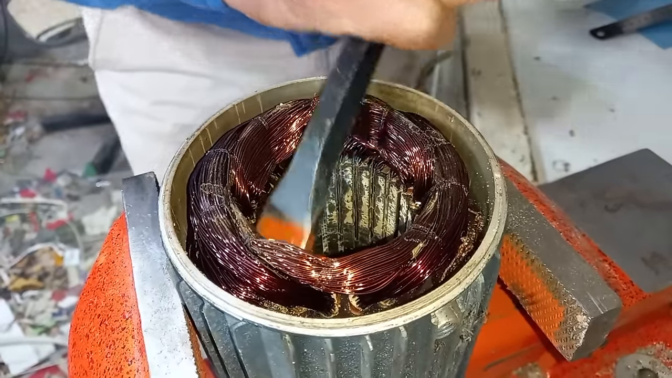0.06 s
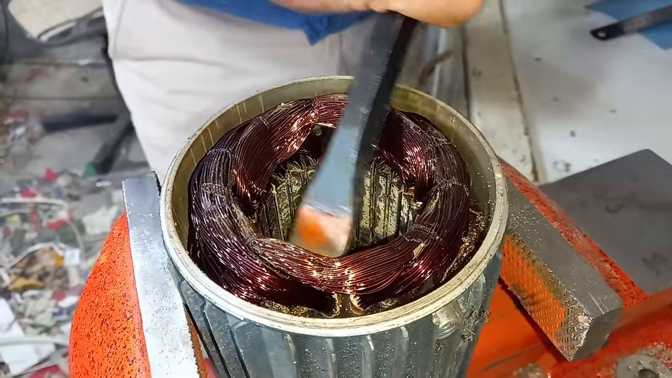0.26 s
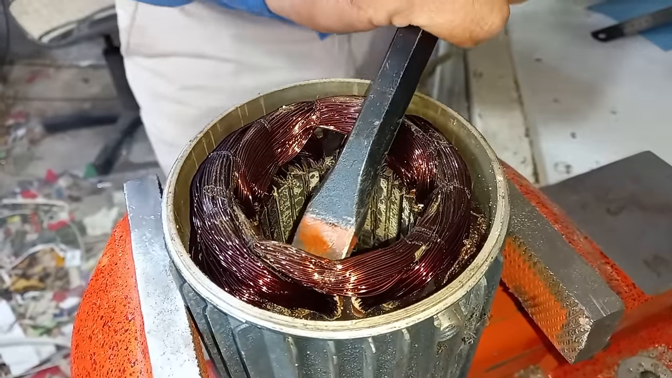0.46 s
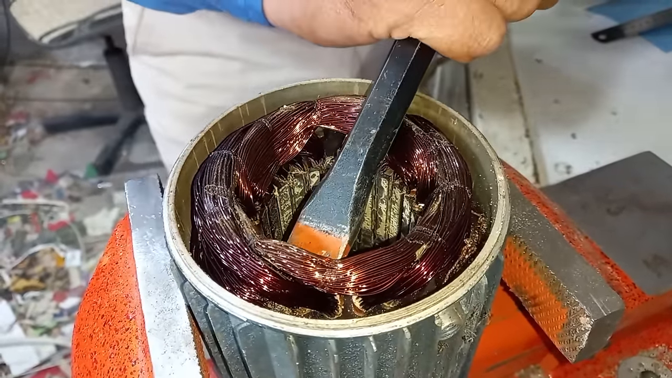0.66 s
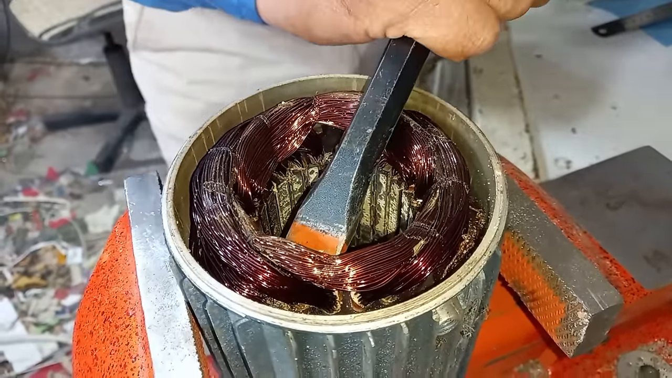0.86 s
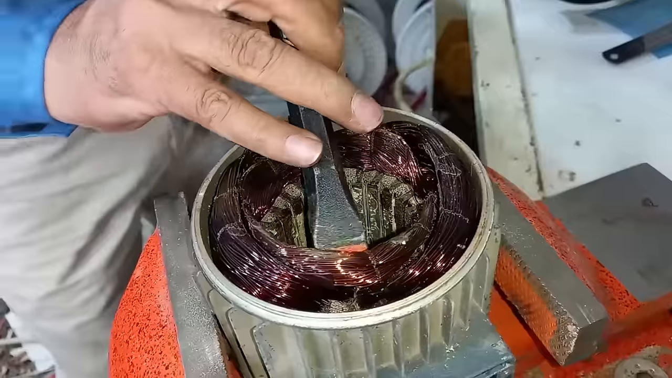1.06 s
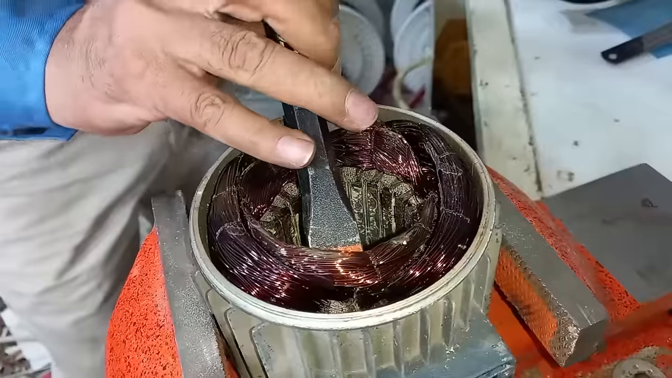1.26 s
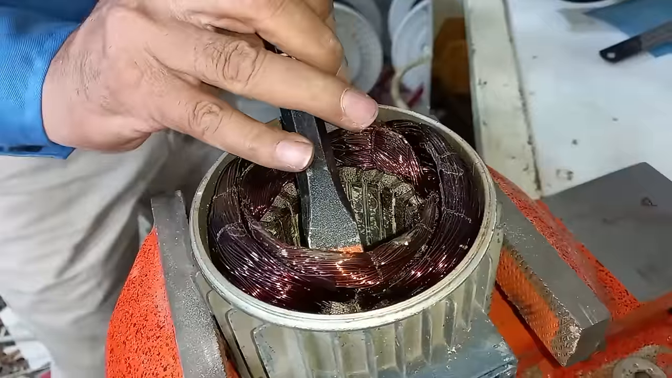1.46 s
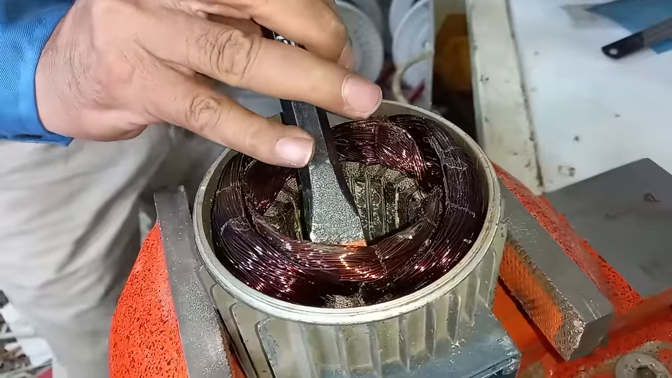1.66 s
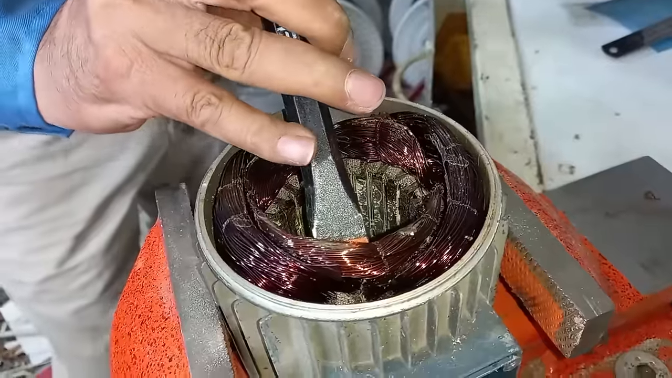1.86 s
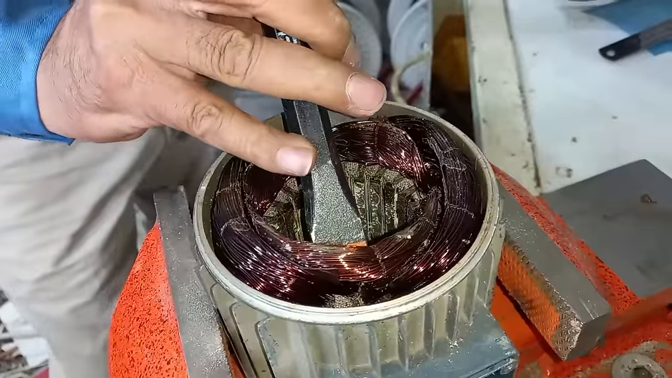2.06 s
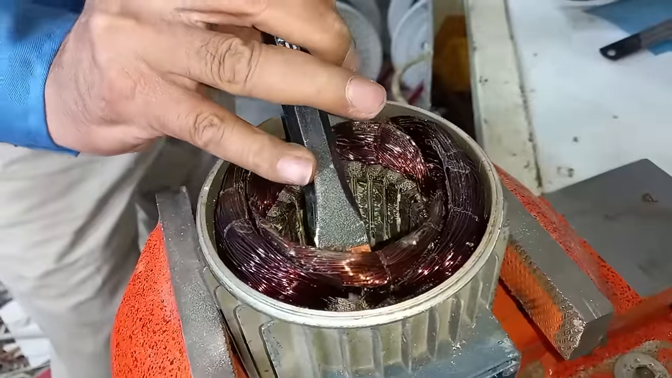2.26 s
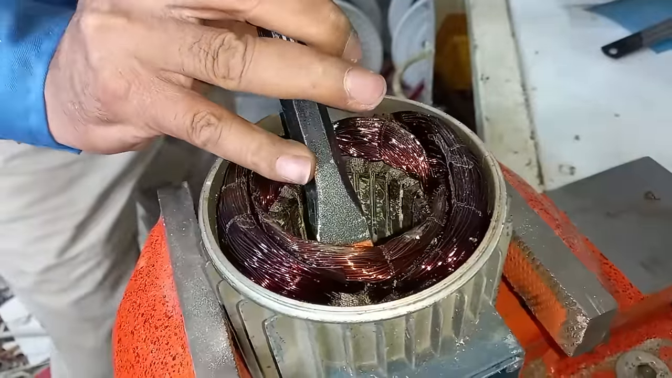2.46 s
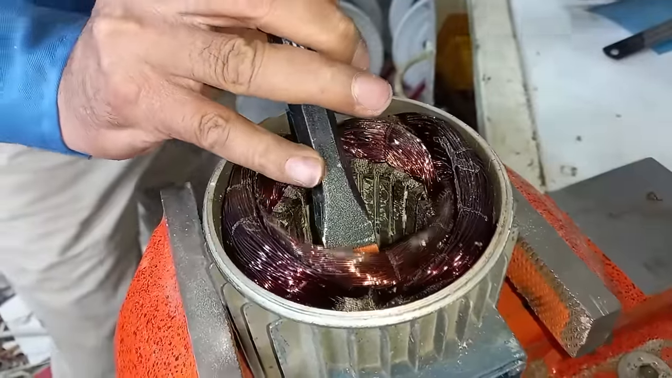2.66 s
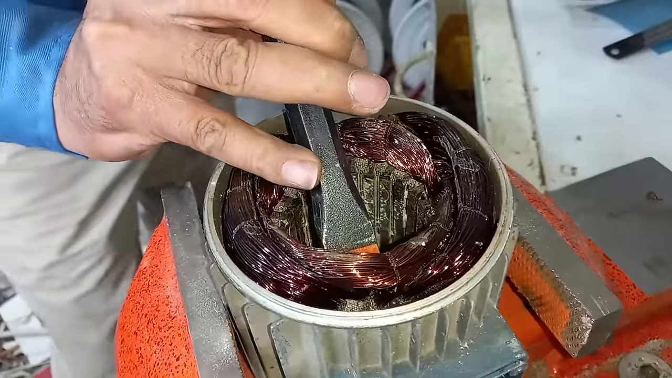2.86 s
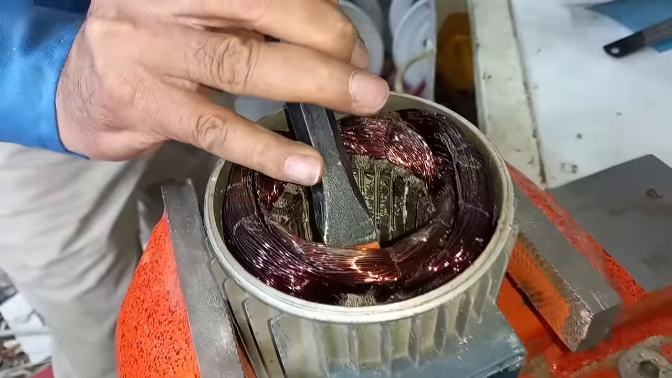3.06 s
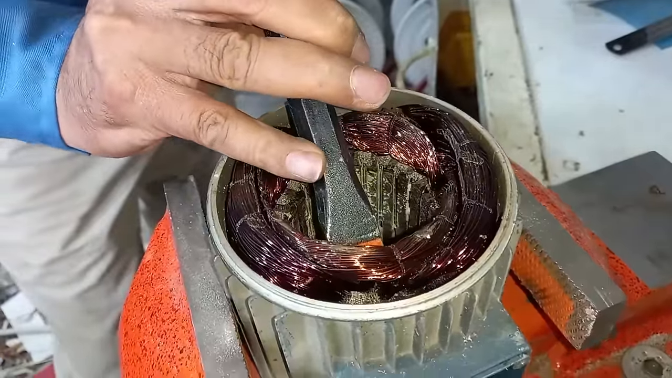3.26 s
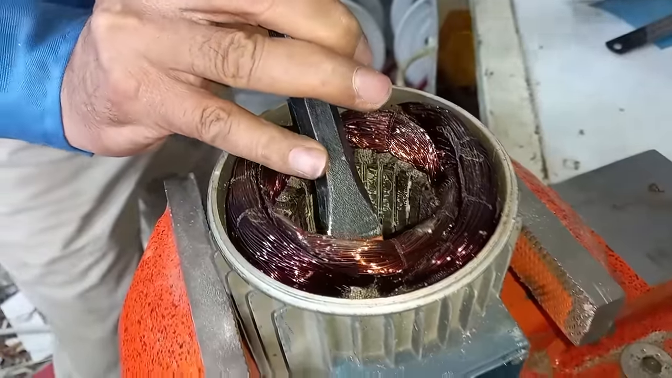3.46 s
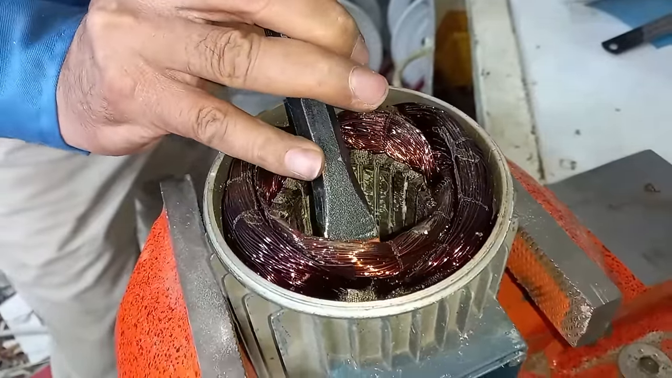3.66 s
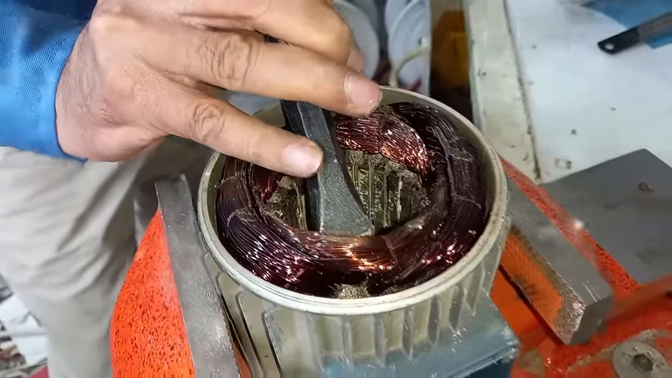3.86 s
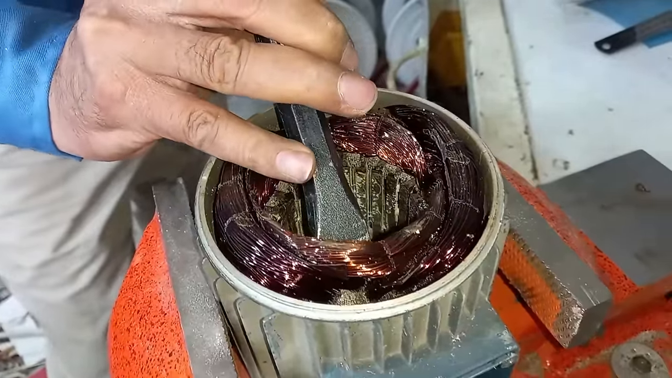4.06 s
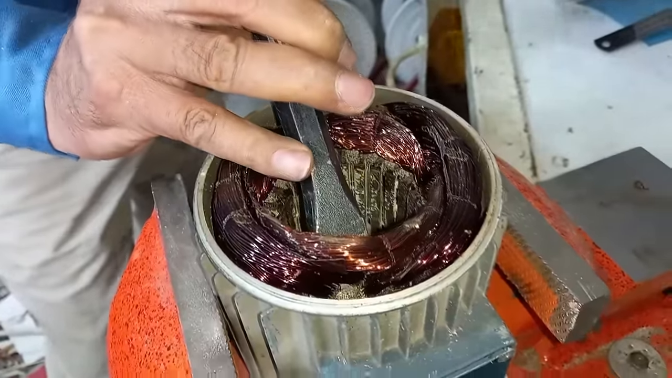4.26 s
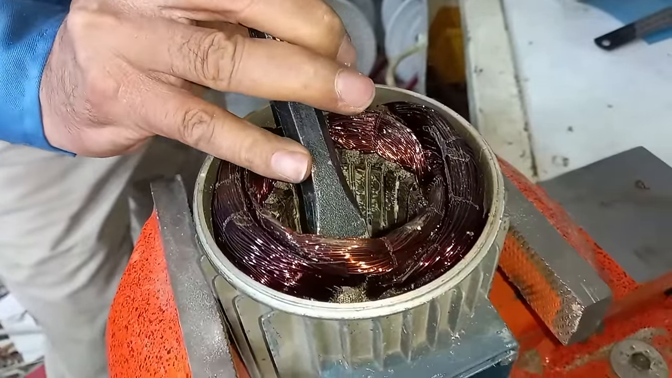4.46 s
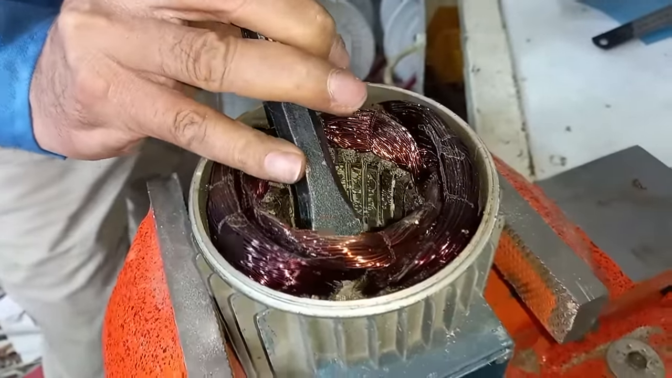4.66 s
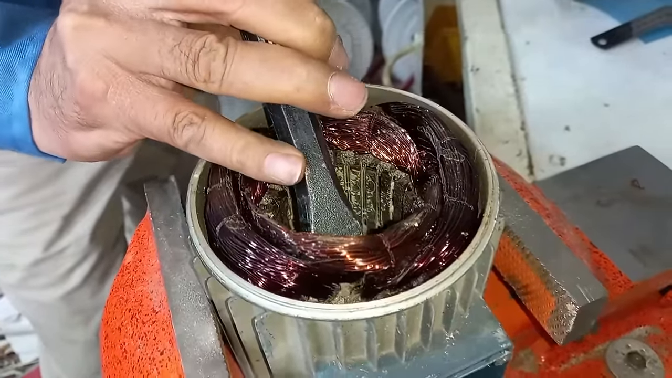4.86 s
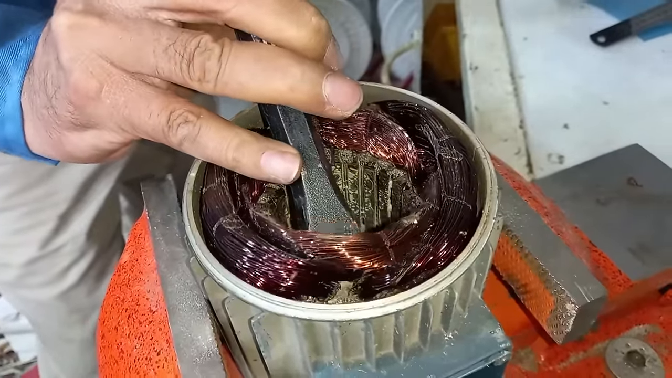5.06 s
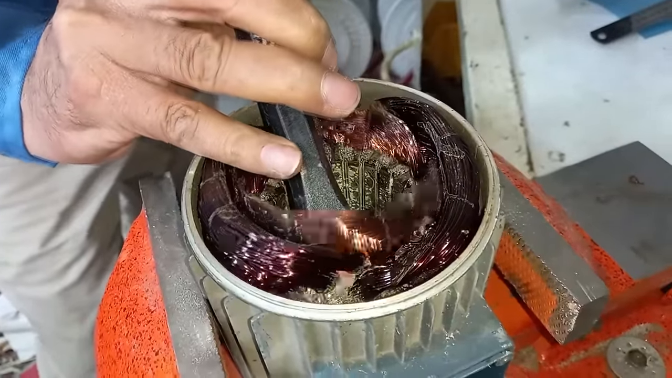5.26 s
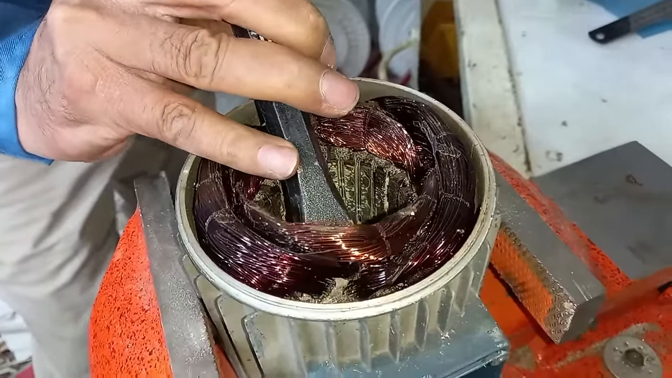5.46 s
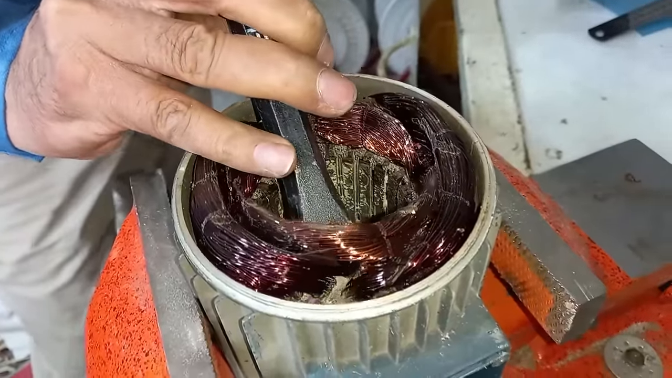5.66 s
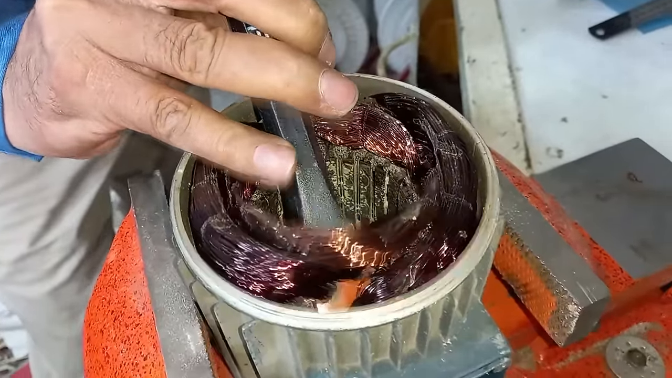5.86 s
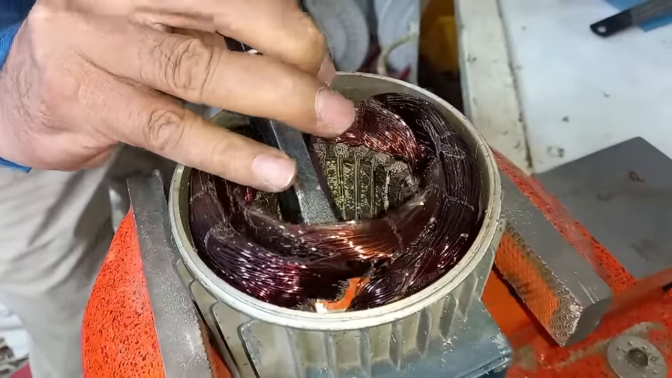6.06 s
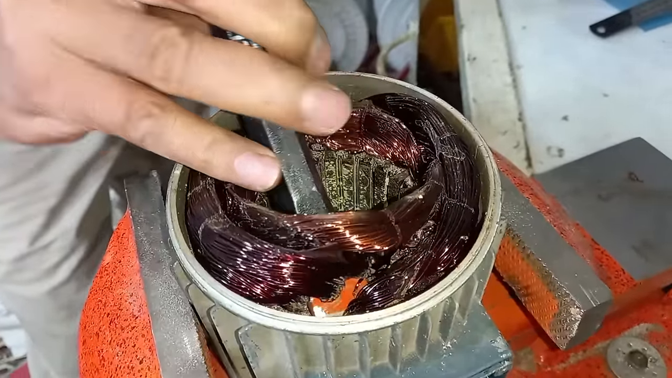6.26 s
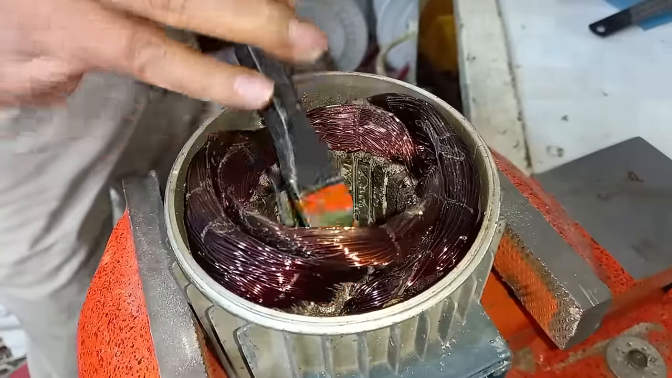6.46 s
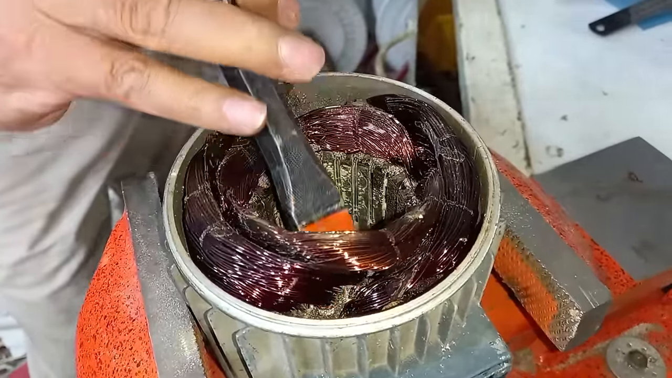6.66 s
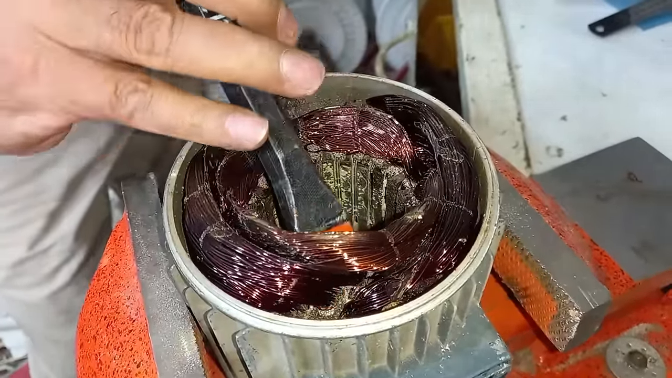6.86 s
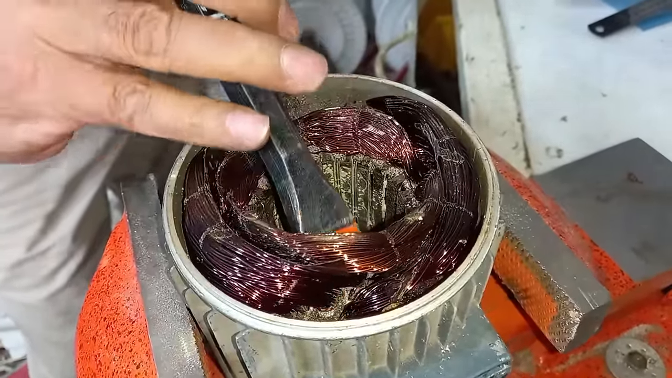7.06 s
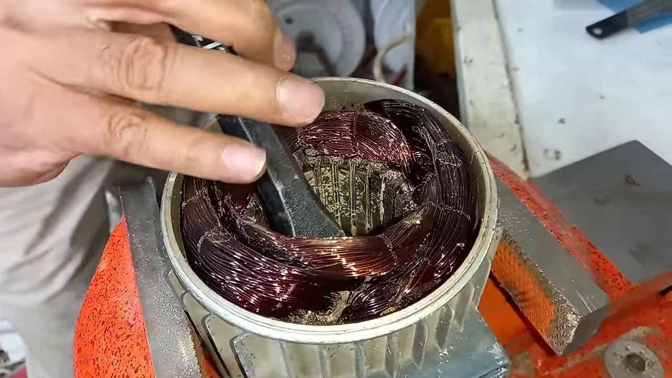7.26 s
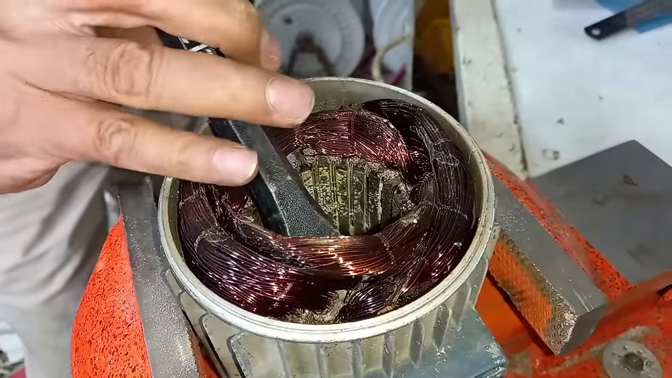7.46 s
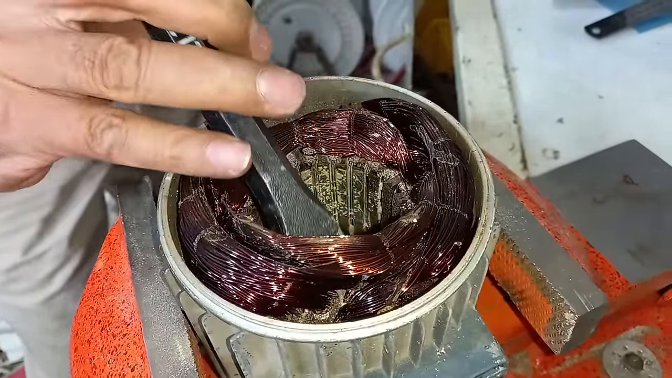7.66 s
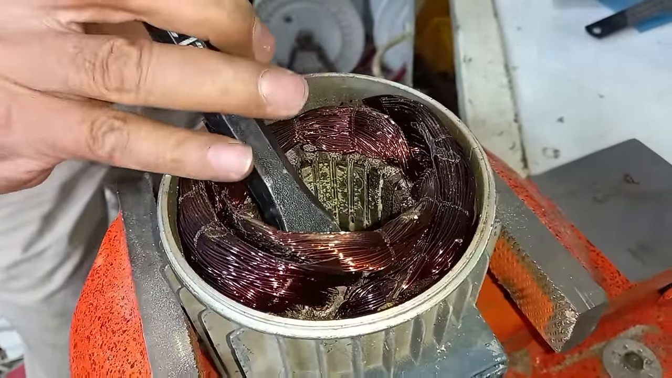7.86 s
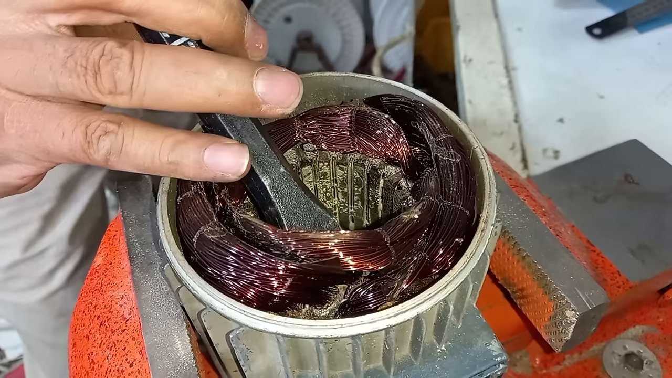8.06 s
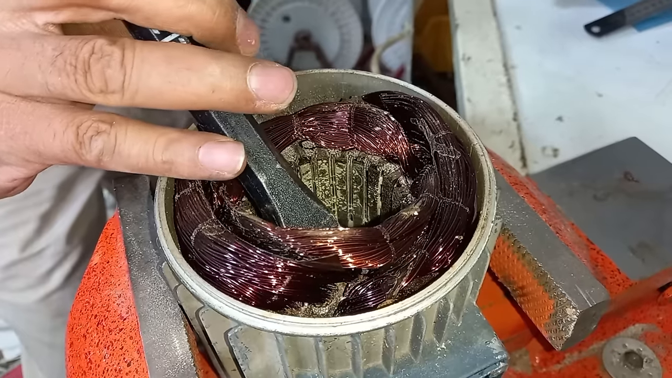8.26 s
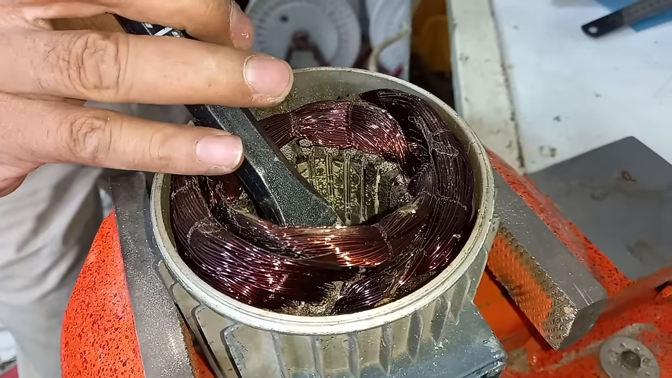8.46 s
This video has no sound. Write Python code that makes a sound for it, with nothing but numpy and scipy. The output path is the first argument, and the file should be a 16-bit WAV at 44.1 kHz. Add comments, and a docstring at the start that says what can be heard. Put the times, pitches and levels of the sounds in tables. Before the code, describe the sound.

A steel chisel ticks and scrapes quietly into the copper windings of a motor held in a vice. Then a hammer strikes it twelve times, about three a second, each blow a bright clang with a bench thump and a low boom, with faint squeaks and soft knocks between. The chisel comes out with a few ticks, a shuffle and tiny wire pings. Close stereo sound in a small workshop with a faint machine hum.

```python
"""Over a faint hum, a steel chisel ticks and scrapes into the copper windings of a motor held in a vice.
We are in a small workshop, a stereo microphone near the bench, a machine running in the background.
Twelve hammer blows follow, with squeaks and soft knocks between. Each clangs in the steel, thumps the
bench and leaves motor and vice booming, higher as the blade sinks in. Last, the chisel is pulled out
with a few ticks, a shuffle and the pings of a taut wire."""
import sys
import numpy as np
from scipy import signal
from scipy.io import wavfile
from scipy.ndimage import uniform_filter1d

SR = 44100
rng = np.random.default_rng(int(sys.argv[2]) if len(sys.argv) > 2 else 0)


def dump_mix(stems):
    """Bounce the given channels to the path in sys.argv[1] as a 16-bit WAV at rate SR."""
    frames = np.atleast_2d(stems).T  # one column per channel
    limited = np.clip(frames, -1, 1)  # hard clip at full scale
    pcm = np.round(limited * 32767).astype(np.int16)
    wavfile.write(sys.argv[1], SR, pcm)


N = 375732
TIME = np.arange(N) / SR
AGE = TIME[:SR * 3 // 4]   # seconds since a contact
SIDES = np.array([[1], [-1]])   # left, right
BAND_EDGES_HZ = np.geomspace(28, 17000, 24)

# Stereo width at the microphone. Each row: frequency in Hz, side over mid in dB.
STEREO_WIDTH = [(40, -3.5), (130, -19), (280, -10.5), (600, -3.5), (1400, 1.5), (2800, 0), (15000, 0.5)]

# The background machine's hum lines and whirr. Each row: frequency in Hz, relative level in dB.
HUM_LINES = [(59.2, -1), (102.3, 1.5), (161.5, -10), (242.2, -32.5), (328.4, -11)]
WHIRR_SPECTRUM = [(30, -16), (60, -1), (105, 1), (170, -2), (340, -2), (550, -9.5), (850, -9.5),
                  (1500, -26), (2400, -24)]
# Its level before and after the hammering. Each row: time in seconds, relative level in dB.
MACHINE_LEVEL_BEFORE = [(1.08, -54.5), (1.344, -58.5), (1.718, -55), (1.9, -53.5)]
MACHINE_LEVEL_AFTER = [(6.55, -56.5), (6.57, -63.5), (7.114, -65), (7.206, -57.5), (7.956, -56.5),
                       (8.5, -54.5)]

# The blade ticks against the slots.
# Each row: start in seconds, level in dB, t60 in seconds, ring pitch in Hz, ring gain in dB.
BLADE_TICKS = [(0.064, -54, 0.076, 6100, 13), (0.22, -44, 0.22, 815, 31.5), (0.682, -57, 0.007, 8040, 12),
               (1.778, -65, 0.38, 8870, -6), (6.356, -53.5, 0.33, 5070, 6), (6.391, -46.5, 0.17, 2780, 3),
               (6.469, -46.5, 0.18, 4320, 4), (6.926, -81.5, 0.24, 1090, 39.5)]
# One taut wire pings. Each row: start in seconds, level in dB.
WIRE_PINGS = [(1.075, -78), (7.269, -72), (7.306, -64), (7.698, -59.5), (8.395, -73)]
# The colour of a tick and of a ping. Each row: frequency in Hz, gain in dB.
TICK_SPECTRUM = [(100, -8), (700, -1.5), (2000, 0), (4500, -7), (8500, -7), (15000, -11.5)]
PING_SPECTRUM = [(1000, -4), (5000, -9), (9000, -4), (15000, -13)]

# The blade drags over the windings; the chisel shuffles as it is gripped.
# Each row: start in seconds, length in seconds, level in dB.
SCRAPE_STROKES = [(0.07, 0.13, -44.5), (0.205, 0.027, -38), (0.312, 0.1, -42)]
GRIP_SHUFFLES = [(0.853, 0.023, -68), (7.179, 0.17, -48)]
# The low rub and high rasp of a scrape. Each row: frequency in Hz, relative level in dB.
RUB_SPECTRUM = [(41, -41), (70, 7.5), (218, -6), (388, -7), (492, -7), (550, -12), (633, -50), (749, -23),
                (1470, -52), (2000, -38), (2600, -59), (4400, -120)]
RASP_SPECTRUM = [(900, -39), (1800, 6), (3300, 17), (4600, -12), (6000, 5), (9000, -4), (15000, -21)]
# The hollow stator and the steel under a scrape. Each row: pitch in Hz, width in Hz, relative gain in dB.
STATOR_RESONANCES = [(212.5, 11, 9.5), (371, 27.5, 5), (548.5, 10, -1.5), (801, 26, -14), (1042, 22, -14.5),
                     (1180, 36, -49), (1630, 22, -52)]
RASP_RESONANCES = [(2660, 70, 9), (3270, 200, 0), (3635, 42, 15.5), (4180, 180, -6), (4930, 240, 0),
                   (5990, 270, -8)]

# The blows. Each row: start in seconds, strength in dB, share reaching the motor in dB,
# ring of the blade's seat in Hz, its gain in dB, squeak of the next swing in dB.
HAMMER_BLOWS = [(1.9436, -8.5, -1, 1053, 5.5, -99), (2.2957, -1.5, 1, 5490, 9.5, -99),
                (2.6792, -0.5, 1, 5200, 4, -67.5), (3.0727, 0, 0, 2890, -2, -65),
                (3.476, 0, 0.5, 3050, -3, -62.5), (3.8722, 1.86, 0, 3800, -0.5, -63.5),
                (4.266, 1, 1, 6400, 7, -61.5), (4.629, 0.5, 1.5, 3110, 1.5, -67.5),
                (4.9672, 0.7, 1, 6300, -7, -99), (5.311, 1, .5, 2870, -1.5, -71.5),
                (5.6303, 1.5, 0.5, 2360, -5, -64.5), (5.9354, 0.63, -5.5, 3700, 3, -67)]
# Modes of chisel, hammer head and motor shell, then of motor, vice and bench.
# Each row: pitch in Hz, relative level in dB, t60 in seconds.
STEEL_PARTIALS = [(1165, -6.5, 0.41), (1337, -19.5, 0.083), (1480, -13.5, 0.083), (1645, -34, 0.81),
                  (2315, -15.5, .18), (2732, -25, 0.3), (2810, -21, .24), (3690, -11, 0.25),
                  (5315, -24.5, 0.083), (6340, -11, 0.12), (6540, -12.5, 0.076), (8770, -7.5, 0.16),
                  (8350, -6, 0.13), (13400, -6.5, 0.11), (15380, -1.5, 0.11)]
BODY_PARTIALS = [(91.3, 2.5, 0.52), (110.85, 4.5, 0.39), (135.02, -13.5, 0.87), (141.9, 1.5, 0.49),
                 (217.8, 5.5, 0.35), (245, -5, 0.45), (261.5, -4, 0.49), (297.7, 5.5, 0.32),
                 (310.2, 1, 0.16), (343.2, -1, 0.31), (374, -11.5, 0.415), (392, -5, 0.15),
                 (444.9, 2.5, 0.19), (505, -9.5, 0.38), (576, -10, .36), (770, -17.5, 0.51)]
# Dense ringing of metal and room. Each row: frequency in Hz, relative level in dB.
CLANG_SPECTRUM = [(50, -7), (110, 2), (175, 12.5), (290, 11.5), (450, 11.5), (620, 11), (900, 10),
                  (1450, 6), (2600, 7), (4600, 0.5), (6000, -3), (7400, 3), (8700, -1.5), (11000, -4.5),
                  (15500, -9)]
# How long it hangs in the workshop. Each row: frequency in Hz, t60 in seconds.
CLANG_DECAY = [(60, .7), (260, 0.65), (700, 0.37), (1800, 0.3), (4800, 0.25), (12800, .21)]
# Crowded overtones of the chisel. Each row: centre in Hz, width in Hz, gain in dB.
CHISEL_RESONANCES = [(6000, 280, 0), (8430, 300, -3), (13700, 720, 9), (15400, 320, 4.5)]

# Light knocks between the blows. Each row: start in seconds, level in dB.
LIGHT_KNOCKS = [(2.864, -44), (3.003, -47.5), (3.242, -43), (3.662, -45), (3.784, -46.5), (3.974, -63),
                (4.055, -44), (4.174, -44), (4.43, -48), (4.522, -52.5), (5.819, -53)]
# Their colour. Each row: frequency in Hz, gain in dB.
KNOCK_SPECTRUM = [(80, 5), (450, 10.5), (1100, 8.5), (2500, -2.5), (5000, -15.5), (8500, -17), (11000, -44),
                  (15000, -48.5)]
# Their tail in the room. Each row: frequency in Hz, t60 in seconds.
KNOCK_DECAY = [(300, 0.62), (1500, 0.23), (8000, 0.28)]


def from_db(db):
    """Decibels to gain."""
    return 10 ** (np.asarray(db) / 20)


def unit_rms(x):
    """Scale to unit power."""
    return x / np.sqrt(np.mean(x ** 2) + 1e-20)


def at_hz(points, hz):
    """Read a curve on a log-frequency axis."""
    freqs, values = np.transpose(points)
    return np.interp(np.log(hz), np.log(freqs), values)


def drift(knots_per_s):
    """A random curve gliding between knots of spread 1."""
    knots = rng.standard_normal(4096)
    return np.interp(TIME * knots_per_s, np.arange(len(knots)), knots)


def decay(t60):
    """Fall by 60 dB in t60 seconds after a contact."""
    return np.exp(-np.log(1000) * AGE / t60)


def add(out, start_s, sound):
    """Mix a sound in at its start time."""
    start = round(start_s * SR)
    out[:, start:start + sound.shape[-1]] += sound[..., :N - start]


def butter(x, hz, kind, order=2):
    """Butterworth filter."""
    return signal.sosfilt(signal.butter(order, hz, kind, fs=SR, output="sos"), x)


def resonate(x, hz, width_hz):
    """Band resonance with gain 1 at its peak."""
    radius = np.exp(-np.pi * width_hz / SR)
    feedback = [1, -2 * radius * np.cos(2 * np.pi * hz / SR), radius ** 2]
    return signal.lfilter(np.array([1, 0, -1]) * (1 - radius ** 2) / 2, feedback, x)


def resonator_bank(x, rows):
    """Resonances in parallel, neighbours in opposite polarity."""
    return sum((-1) ** k * from_db(db) * resonate(x, hz, width) for k, (hz, width, db) in enumerate(rows))


def white(size=len(AGE)):
    """Two unrelated pairs of mid and side noise, for alternate bands."""
    return rng.standard_normal((2, 2, size))


def coloured(noise, spectrum, gain_at):
    """Stereo noise shaped by a spectrum and by gain_at(Hz), a number or an envelope per band."""
    out = 0
    for k, (low, high) in enumerate(zip(BAND_EDGES_HZ, BAND_EDGES_HZ[1:])):
        hz = np.sqrt(low * high)
        gain = from_db(at_hz(spectrum, hz)) * gain_at(hz)
        mid, side = butter(noise[k % 2] * gain + 1e-18, [low, high], "band")
        out = out + mid + SIDES * side * from_db(at_hz(STEREO_WIDTH, hz))
    return out


def machine(waver_hz=2.5, flutter_db=0.5, airy_hz=2080, left_lag_s=0.0001925):
    """In the background, a little to the right: unsteady hum lines, a dull whirr and a faint hiss."""
    level_db = np.interp(TIME, *np.transpose([*MACHINE_LEVEL_BEFORE, *MACHINE_LEVEL_AFTER]))
    swing_db = level_db - level_db.mean()
    faint, full = TIME < 0.98, TIME > 1.025   # faint at first, a brief gap, then full level
    hum_level = uniform_filter1d(faint * from_db(-82.5) + full * from_db(level_db - 3), size=256)
    whirr_level = uniform_filter1d(faint * from_db(-78.5) + full * from_db(swing_db - 61.5), size=256)
    hum = 0
    for hz, db in HUM_LINES:
        phase = 2 * np.pi * np.cumsum(hz + waver_hz * drift(15)) / SR
        amplitude = np.sqrt(2) * from_db(db + flutter_db * drift(3.8))
        hum = hum + amplitude * np.sin(phase - SIDES * np.pi * hz * left_lag_s)
    whirr = unit_rms(coloured(white(N), WHIRR_SPECTRUM, lambda hz: hz < 8000))
    whirr = whirr + from_db(4) * resonate(whirr, airy_hz, width_hz=300)
    whirr = butter(whirr, 2350, "low", order=12) + from_db(-13.5) * whirr
    hiss = from_db(-83) * resonate(rng.standard_normal((2, N)), hz=8300, width_hz=2500)
    return (hum_level * hum + whirr_level * whirr + hiss) * from_db(-0.8 * SIDES)


def tick(spectrum, db, t60, ring_hz, ring_db, snap_db=6, snap_t60=0.0027):
    """A bright contact: a short snap and its tail in the room set one wire or slot ringing."""
    envelope = decay(t60) + from_db(snap_db) * decay(snap_t60)
    burst = coloured(white() * envelope, spectrum, lambda hz: from_db(db))
    return burst + from_db(ring_db) * resonate(burst, ring_hz, width_hz=ring_hz / 25)


def blade_ticks():
    """The blade catches the motor's slots going in and coming out."""
    out = np.zeros((2, N))
    for start_s, *contact in BLADE_TICKS:
        add(out, start_s, tick(TICK_SPECTRUM, *contact))
    return out


def rub_envelope(start_s, length_s, db, attack_s=0.0056, release_db_per_s=175):
    """One rub: quick attack, hold, steady release."""
    attack = np.clip((TIME - start_s) / attack_s, 0, 1)
    lifted_s = np.maximum(TIME - start_s - length_s, 0)
    return attack * from_db(db - release_db_per_s * lifted_s)


def rasp_envelope(start_s, length_s, db, peak_share=0.72, swell_db=13):
    """The rasp peaks where the blade presses hardest and dies faster than the rub."""
    pressure = np.interp((TIME - start_s) / length_s, [0, peak_share, 1], [0, 1, 0])
    return rub_envelope(start_s, length_s, db - 26.5, release_db_per_s=273) * from_db(swell_db * pressure)


def scraping(slips_per_s=1000, grain_db=2.5):
    """The blade slips from wire to wire, ringing the hollow stator and rasping; the grip shuffles."""
    rub_level = np.max([rub_envelope(*row) for row in SCRAPE_STROKES], axis=0)
    rasp_level = np.max([rasp_envelope(*row) for row in SCRAPE_STROKES], axis=0)
    shuffle_level = sum(rub_envelope(*row) for row in GRIP_SHUFFLES)
    slipping = rng.random(N) < slips_per_s / SR
    slips = slipping * (rng.standard_normal(N) + 0.5 * SIDES * rng.standard_normal(N))
    rumble = unit_rms(coloured(white(N), RUB_SPECTRUM, lambda hz: hz < 2000))
    hollow = unit_rms(resonator_bank(slips, STATOR_RESONANCES))
    rub = unit_rms(rumble + from_db(5) * hollow)
    rough_noise = white(N) * from_db(grain_db * drift(300))
    grain = unit_rms(coloured(rough_noise, RASP_SPECTRUM, lambda hz: hz > 900))
    grit = unit_rms(resonator_bank(slips, RASP_RESONANCES))
    rasp = unit_rms(grain + from_db(-1) * grit)
    shuffle = unit_rms(butter(rumble, [110, 300], "band"))
    return rub_level * rub + rasp_level * rasp + shuffle_level * shuffle


def wire_pings():
    """One taut wire rings, always at the same high pitch."""
    out = np.zeros((2, N))
    for start_s, db in WIRE_PINGS:
        add(out, start_s, tick(PING_SPECTRUM, db, t60=0.17, ring_hz=8920, ring_db=15.5))
    return out


def crack(hz=4300, t60=0.001):
    """Steel meets steel: one very short pulse, a little out of phase across the microphone."""
    return np.sin(2 * np.pi * hz * AGE + SIDES * rng.uniform(0, 1)) * decay(t60)


def clang(noise, excitation, direct_t60=0.011):
    """The bright direct ring of the steel arrives first, then countless metal and room resonances."""
    def envelope_at(hz):
        direct = 0.32 * hz / (hz + 1500) * decay(direct_t60)
        return from_db(at_hz(excitation, hz)) * (direct + decay(at_hz(CLANG_DECAY, hz)))
    wash = coloured(noise, CLANG_SPECTRUM, envelope_at)
    return wash + sum(from_db(db) * resonate(wash, hz, width) for hz, width, db in CHISEL_RESONANCES)


def struck_modes(modes, excitation, scatter_db, detune):
    """Ringing modes; strength and pitch shift a little with the grip and the point of contact."""
    out = 0
    for k, (hz, db, t60) in enumerate(modes):
        strength, pitch, place = rng.standard_normal(3)
        gain = from_db(db + at_hz(excitation, hz) + scatter_db * np.tanh(strength))
        stereo_phase = SIDES * np.arctan(from_db(at_hz(STEREO_WIDTH, hz))) * place
        wave = np.sin(2 * np.pi * hz * (1 + detune * pitch) * AGE + stereo_phase)
        out = out + (-1) ** k * gain * wave * decay(t60)
    return out


def clang_colour(wash, count=44, width_hz=55):
    """Many narrow resonances, different on each blow, colour the clang."""
    pitches = np.linspace(1200, 11000, count) + rng.uniform(-150, 150, count)
    gains = from_db(-1.5) * rng.uniform(0, 1.5, count)
    return sum(gain * resonate(wash, hz, width_hz) for hz, gain in zip(pitches, gains))


def bench_thump(hz=60, length_s=0.023):
    """The bench gives under the blow and settles within two swings, left of centre."""
    swell = np.sin(np.pi * np.minimum(AGE / length_s, 1))
    return from_db(2.5 * SIDES) * swell * np.sin(2 * np.pi * hz * AGE + 0.35 * SIDES)


def blow_excitation(strength_db, motor_db, sunk):
    """A blow's (Hz, dB) curve: brighter when harder; the boom yields to higher modes as the blade sinks."""
    boom = strength_db + motor_db - 21.5 - 5 * sunk
    body = strength_db + motor_db - 25 + 1.5 * sunk
    shell = -27 + 0.67 * strength_db
    ring = -25 + 0.91 * strength_db
    treble = -22 + 1.8 * strength_db
    sizzle = -25.5 + strength_db
    return [(140, boom), (230, body), (450, body), (800, shell), (1050, shell),
            (1400, ring), (3500, ring), (6000, treble), (9000, treble), (13500, sizzle)]


def hammer(repeat_share=0.18, sinking_s=(2.6, 4.2), body_rise_s=0.032, left_over_right_db=0.56):
    """Up front, each blow rings the steel at once; the heavy motor and vice take time to swing up."""
    out = np.zeros((2, N))
    shared_noise = white()   # the same structure is struck, so part of its clang repeats
    for start_s, strength_db, motor_db, seat_hz, seat_db, _ in HAMMER_BLOWS:
        sunk = np.interp(start_s, sinking_s, [0, 1])
        excitation = blow_excitation(strength_db, motor_db, sunk)
        noise = np.sqrt(repeat_share) * shared_noise + np.sqrt(1 - repeat_share) * white()
        wash = clang(noise, excitation)
        # the blade's seat changes with every cut and favours one region of the ring
        seat = from_db(seat_db) * resonate(wash, seat_hz, width_hz=260)
        ring = struck_modes(STEEL_PARTIALS, excitation, scatter_db=5, detune=0.0042)
        ring *= from_db(1 - 3 * sunk)   # weaker once the wires grip the blade
        steel = ring + wash + seat + clang_colour(wash) + from_db(-7.5 + 0.73 * strength_db) * crack()
        body = struck_modes(BODY_PARTIALS, excitation, scatter_db=3.08, detune=0.0059)
        body *= 1 - np.exp(-AGE / body_rise_s)
        thump = from_db(-19 + 1.7 * strength_db) * bench_thump()
        add(out, start_s, (steel + body + thump) * from_db(SIDES * left_over_right_db / 2))
    return out


def squeak(length_s, hz, db, width_hz=260, flutter_db=3):
    """A short fluttering whistle of narrow-band noise."""
    size = int(length_s * SR)
    whistle = resonate(resonate(rng.standard_normal((2, SR)), hz, width_hz), hz, width_hz)
    whistle = unit_rms(whistle * from_db(flutter_db * drift(70)[:SR]))
    return from_db(db) * signal.windows.tukey(size, 0.5) * whistle[:, :size]


def swing_squeaks(lift_delay_s=0.16, lift_s=0.14, fall_s=0.075):
    """A swing squeaks as the hammer rises, and a little lower just before it lands."""
    out = np.zeros((2, N))
    for blow_s, *_, db in HAMMER_BLOWS:
        add(out, blow_s + lift_delay_s, squeak(lift_s, hz=6770, db=db))
    for (*_, db), (next_blow_s, *_) in zip(HAMMER_BLOWS, HAMMER_BLOWS[1:]):
        add(out, next_blow_s - fall_s, squeak(fall_s, hz=6600, db=db - 1))
    return out


def knocks(note_hz=500, note_db=7, rise_s=0.0029):
    """Soft knocks with one hollow note ring out in the room."""
    out = np.zeros((2, N))
    for start_s, db in LIGHT_KNOCKS:
        push = from_db(db) * white() * (1 - np.exp(-AGE / rise_s))
        knock = coloured(push, KNOCK_SPECTRUM, lambda hz: decay(at_hz(KNOCK_DECAY, hz)))
        add(out, start_s, knock + from_db(note_db) * resonate(knock, note_hz, width_hz=40.37))
    return out


def scene():
    """The work at the bench and the machine behind it, as they reach the microphone."""
    return hammer() + knocks() + blade_ticks() + wire_pings() + swing_squeaks() + scraping() + machine()


def record(dry, low_cut_hz=43, high_cut_hz=15800):
    """The microphone loses the deepest bass, and the top is cut steeply."""
    steep_low_pass = signal.ellip(10, 0.1, 80, high_cut_hz, fs=SR, output="sos")
    return signal.sosfilt(steep_low_pass, butter(dry, low_cut_hz, "high"))


dry = scene()
out = record(dry)
dump_mix(out)
```